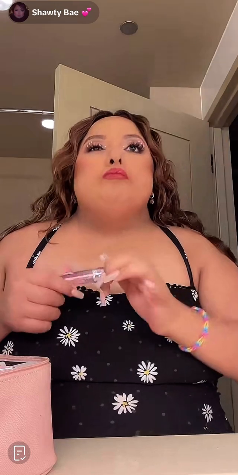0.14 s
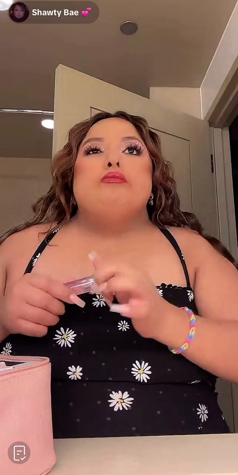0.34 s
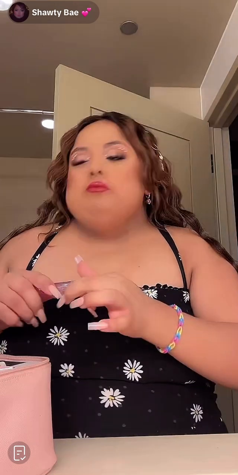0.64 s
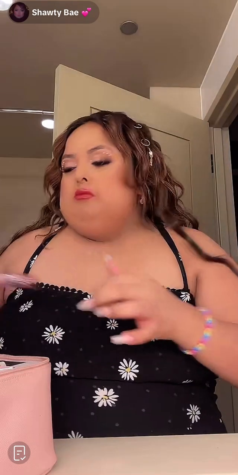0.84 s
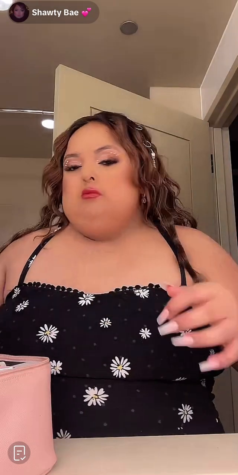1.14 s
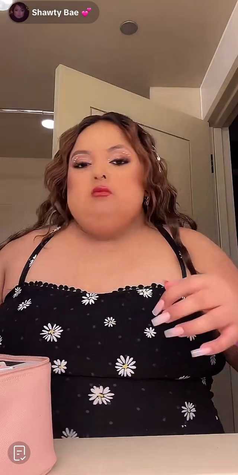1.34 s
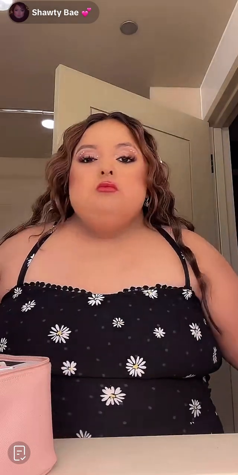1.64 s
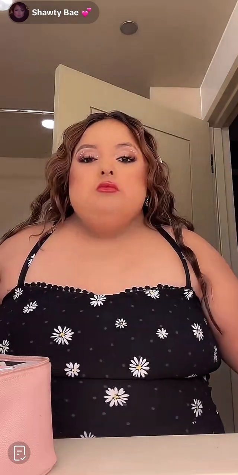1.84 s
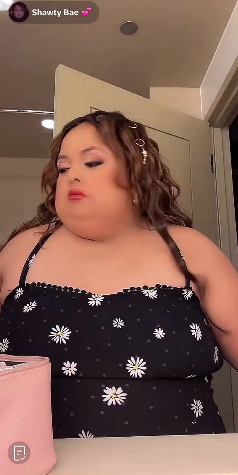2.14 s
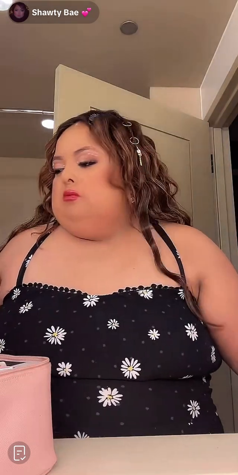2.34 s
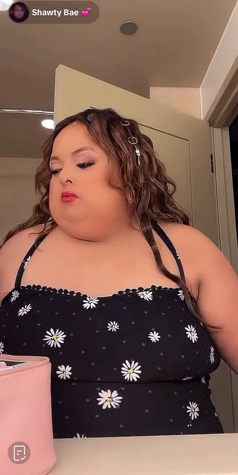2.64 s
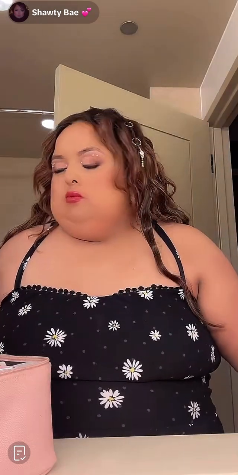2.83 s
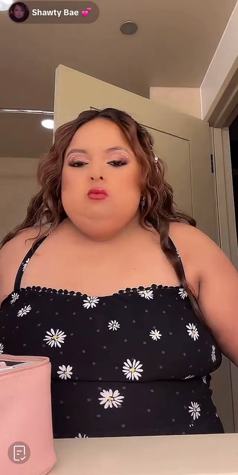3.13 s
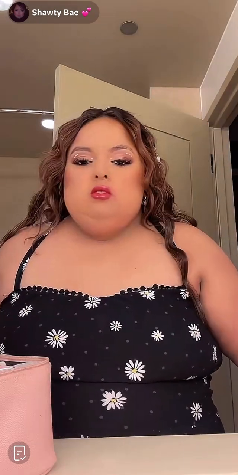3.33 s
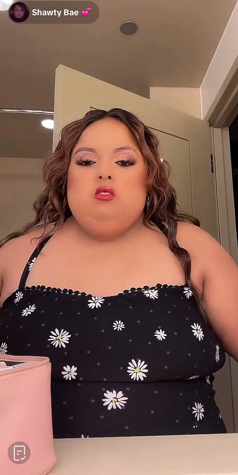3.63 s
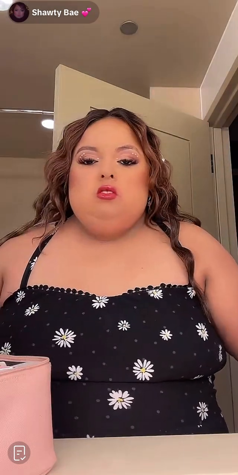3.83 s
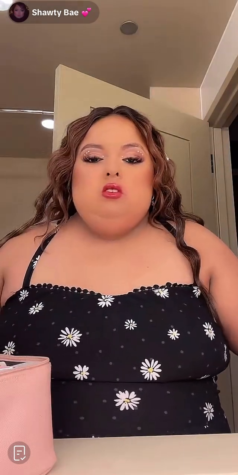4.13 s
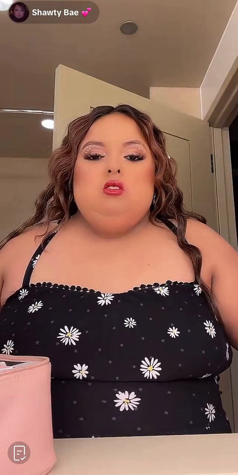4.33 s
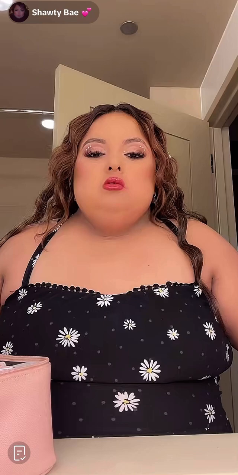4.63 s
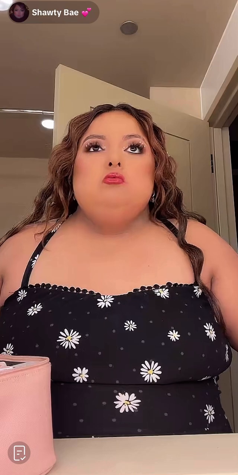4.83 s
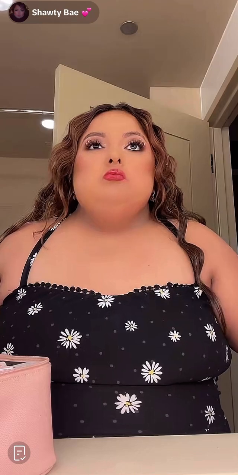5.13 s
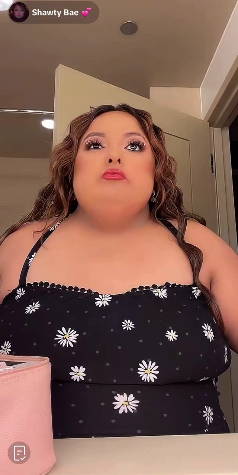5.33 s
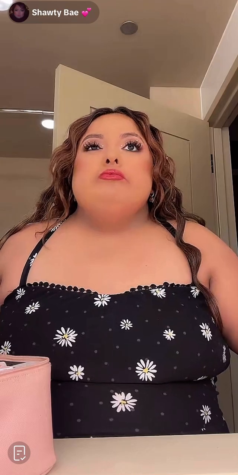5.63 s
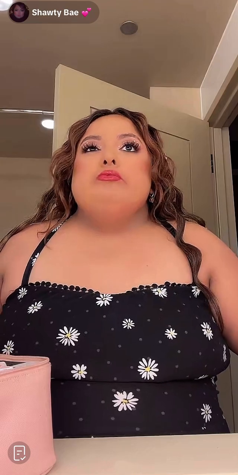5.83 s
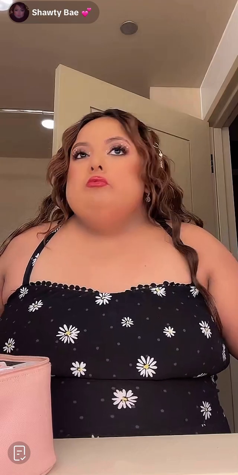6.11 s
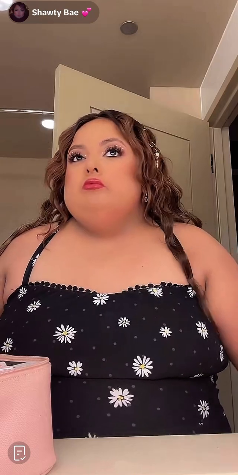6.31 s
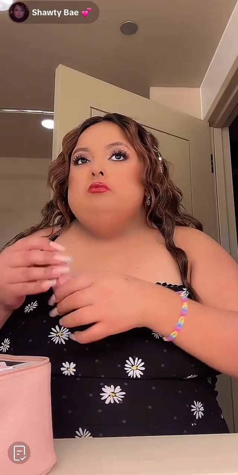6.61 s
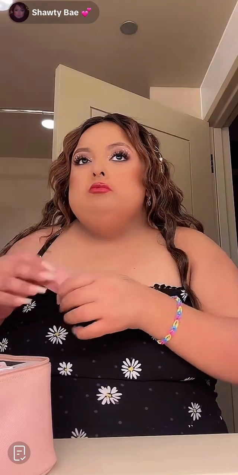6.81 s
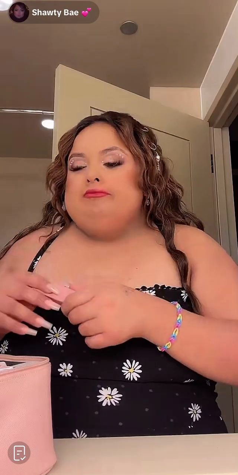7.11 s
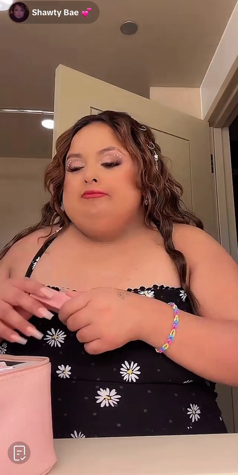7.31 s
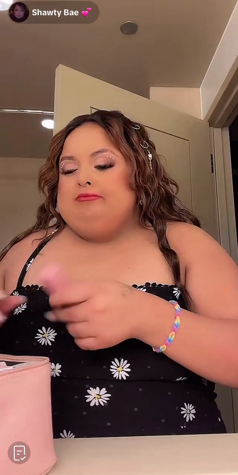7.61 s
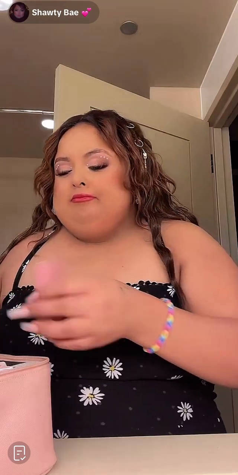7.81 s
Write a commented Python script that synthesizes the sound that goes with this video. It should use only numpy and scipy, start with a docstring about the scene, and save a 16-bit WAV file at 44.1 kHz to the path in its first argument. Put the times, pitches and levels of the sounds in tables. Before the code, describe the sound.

Small cosmetic tubes are set down sharply, then rummaged and knocked about on a countertop in a small, hard room with a faint low hum.

```python
"""A bathroom counter: plastic make-up tubes and caps are put down, picked up and rummaged through near a phone.
They click, knock and jostle as shaped noise bursts and short tones; rubs are grainy, filtered noise.
Heavier bumps boom as decaying sines in the counter, and a container rings in fuzzy narrow bands.
The small hard room answers every contact, over a low ventilation rumble of filtered noise."""
import sys
import numpy as np
from scipy import signal
from scipy.fft import rfft, irfft, next_fast_len
from scipy.io import wavfile
from scipy.ndimage import map_coordinates

SR = 44100
rng = np.random.default_rng(int(sys.argv[2]) if len(sys.argv) > 2 else 0)


def inscribe(sig):
    """Save sig as 16-bit PCM at rate SR to the path in sys.argv[1].

    A 1-D sig is mono; a 2-D sig holds one channel per row.
    Samples are clipped to [-1, 1] before scaling.
    """
    pcm = np.round(np.clip(np.atleast_2d(sig).T, -1, 1) * 32767)
    wavfile.write(sys.argv[1], SR, pcm.astype(np.int16))


N = 351035
SIZE = 32768  # longest single sound [samples]
T = np.arange(SIZE) / SR
HZ = np.fft.rfftfreq(SIZE, 1 / SR)

# Ventilation spectrum, relative: (frequency [Hz], density [dB per Hz])
VENT_SPECTRUM = [(20, -43.5), (40, -28.5), (58, -9.5), (78, -12.5), (100, -11), (128, 1), (165, -18.5),
                 (207, -6), (260, -21.5), (320, -19), (500, -29), (1400, -37), (5000, -40), (13000, -50.5)]
# Deepest room mode, stirred by the heavier bumps: (time [s], relative level [dB])
ROOM_MODE_LEVEL = [(0, -72), (1.53, -69.5), (1.72, -49), (1.95, -63.5), (3.1, -68), (3.39, -48),
                   (3.95, -65.5), (4.17, -30), (4.45, -47.5), (5.55, -51), (6, -58), (6.6, -50),
                   (7.96, -59)]
# Decay of the room's reflections: (frequency [Hz], time to fall 60 dB [s])
ROOM_DECAY = [(200, 0.29), (700, 0.4), (2000, 0.38), (5000, 0.66), (12000, 0.43)]
# Sideways scatter against the centre: (frequency [Hz], level [dB])
SIDE_LEVEL = [(2500, -73), (4500, -29.5), (8000, -3.5), (13000, -14.5)]
# Bumps on the counter: (time [s], level [dB], softness: corner above which modes weaken [Hz])
COUNTER_BUMPS = [(1.558, -33.5, 350), (1.627, -33.5, 260), (1.703, -29.5, 136.9), (3.298, -36.5, 251),
                 (3.344, -30.5, 401.3), (3.373, -35, 260), (3.965, -26.5, 109.6), (4.01, -15.5, 151),
                 (4.363, -34.5, 78), (4.636, -38.5, 380), (4.997, -36, 195), (6.181, -40.5, 379)]
# Modes of the counter: (frequency [Hz], level [dB], time to fall 60 dB [s])
COUNTER_MODES = [(58.2, -3.5, 0.45), (93.84, -2.5, 0.44), (117.2, -1.5, 0.29), (157, -0.5, 0.19),
                 (231.1, 1, 0.21), (308, 6, 0.31), (400, -3, 0.58)]
# Blows on the container: (time [s], level [dB], brightness [dB per octave], time to fall 60 dB [s], length [s])
CONTAINER_BLOWS = [(3.088, -43.5, 2, 0.42, 0.069), (5.197, -42, 11, 0.26, 0.21), (4.04, -38, 3.5, 3, 1),
                   (4.22, -58.5, -10, 3.7, 0.85), (5.0, -33.5, 2.5, 1.14, 0.2),
                   (6.16, -41.5, 5, 0.47, 0.43), (6.46, -50.5, 9, 0.58, 0.64)]
# Resonances of the container: (frequency [Hz], width [Hz], level [dB])
CONTAINER_MODES = [(654, 140, 3.5), (806, 68, 4), (1104, 50, -3.5), (1549, 490, 4), (1630, 44, -6),
                   (2480, 330, -5.5), (2680, 29, -4.5), (3390, 220, -10.5)]
# Loose items jostling: (start [s], end [s], tick density [1/s], level at the start [dB], fall by the end [dB])
JOSTLE_SPELLS = [(1.658, 1.77, 85, -25, 5), (4.047, 4.466, 50, -22.5, 8.5), (4.719, 4.84, 33, -21, 10),
                 (5.022, 5.183, 68, -17, 25)]
# Rubs of fingers, cases and the bag: (time of the peak [s], swell time [s], level [dB], centre [Hz])
RUB_STROKES = [(0.129, 0.05, -51, 5060), (0.439, 0.13, -65.5, 3400), (.75, 0.18, -58, 3900),
               (1.27, 0.21, -63, 4240), (1.77, 0.034, -40, 5190), (2.04, 0.036, -58.5, 10570),
               (2.106, 0.017, -39, 11200), (2.14, 0.051, -52, 10040), (2.278, 0.033, -49.5, 5990),
               (2.79, 0.029, -53.5, 3200), (2.833, 0.03, -52, 9030), (2.948, 0.057, -57.5, 3800),
               (3.289, 0.026, -31, 640), (3.379, .052, -25, 172), (3.391, 0.07, -30, 620),
               (3.455, 0.06, -29.5, 1070), (3.485, .048, -33, 4520), (3.868, 0.066, -50.5, 6300),
               (3.956, 0.016, -31.5, 3250), (4.11, 0.082, -28, 760), (4.38, 0.12, -36.5, 2780),
               (4.623, 0.0095, -25.5, 1430), (4.796, .028, -19.5, 980), (4.874, 0.043, -32.5, 676),
               (4.974, 0.03, -17, 1400), (4.991, 0.021, -24, 5700), (5.11, 0.071, -35, 1830),
               (5.241, 0.076, -50.5, 231.3), (5.8, 0.038, -61.5, 9460), (6.22, 0.054, -44, 305),
               (6.471, .033, -32, 4700), (6.719, 0.16, -59.5, 328), (6.938, 0.033, -60, 348),
               (6.749, .15, -49.5, 5340), (7.069, 0.03, -47.5, 9350), (7.159, 0.047, -42.5, 9080),
               (7.67, 0.056, -54, 7860), (7.931, 0.055, -54.5, 6450)]
# Spectral spread of a rub, broadest in the middle range: (centre [Hz], spread [octaves])
RUB_SPREAD = [(200, 0.26), (800, .8), (2500, 1), (6000, .6), (10000, 0.29)]
# Rubs that make one narrow resonance sing: (time of the peak [s], swell time [s], level [dB], centre [Hz])
SINGING_RUBS = [(.24, 0.035, -52, 4370), (1.28, 0.043, -47.5, 392.8), (1.8, 0.032, -43, 3860),
                (4.88, 0.035, -36, 7700), (4.88, 0.031, -36.5, 2740), (5.236, .045, -44.5, 1802),
                (5.8, 0.039, -58.5, 8900), (6.22, 0.047, -42, 3440), (6.2, 0.052, -53, 9500),
                (6.6, 0.17, -56.5, 1067), (6.67, 0.17, -57.5, 2650)]
# Short pitched knocks and ticks: (time of the peak [s], level [dB], centre [Hz])
PITCHED_KNOCKS = [(0.11, -47, 1500), (1.564, -14, 510), (3.492, -24, 519), (3.681, -45.5, 1800),
                  (4.637, -19, 498), (5.756, -37.5, 548), (7.776, -42.5, 2400), (7.814, -40.5, 2600)]
# Contacts of tubes and caps: (time [s], relative level [dB], main resonance [Hz],
# treble slope above it [dB per octave], rebound [dB], room answer [dB], length of the answer [s])
ITEM_CONTACTS = [(0.106, -68, 1640, -5, -11, -4, 0.12), (0.221, -52.5, 595, -5, -15, -7.5, 0.15),
                 (1.539, -48, 1100, -2.5, -18, -17, .06), (1.559, -19, 1184, -4.5, -3, -8, 0.47),
                 (1.575, -26, 3190, -2, -0.5, -7, .16), (1.628, -19, 1500, -1, -2.5, -7.5, 0.11),
                 (1.65, -22.5, 3730, 2, -7, -4.5, 0.17), (2.106, -53, 8000, 2.5, -11.5, -6.5, 0.12),
                 (3.085, -31.5, 2590, -13, -21.5, 0.5, 0.15), (3.091, -34.5, 1750, -8.5, -7.5, 1, 0.12),
                 (3.257, -29, 4810, -15.5, -3.5, -8.5, 0.097), (3.337, -22, 860, -3.5, -5.5, -8.5, .5),
                 (3.489, -33, 540, -1, -14, -8, 0.078), (3.961, -21.5, 5970, 2, -10, -13, .5),
                 (3.969, -32, 833, -0.5, -12.5, -1.5, 0.44), (4.009, -28.5, 1440, 0.5, -1.5, -18, .35),
                 (4.03, -15.5, 1250, -12, -14, -26, .4), (4.038, -22.5, 1090, -3, -14.5, -4.5, .65),
                 (4.213, -26.5, 2580, -8, -24, -4.5, .3), (4.223, -21, 3300, -7.5, -13, -5.5, 0.21),
                 (4.329, -25.5, 4010, -8, -14.5, -13, 0.21), (4.411, -37, 3340, 1.5, -12, -8, 0.054),
                 (4.623, -24.5, 1250, -1, -7, -8, .16), (4.706, -21, 580, -2.5, -2, -5, 0.17),
                 (4.744, -32.5, 800, -3, -16.5, -0.5, .35), (4.803, -30.5, 1270, -5, -14.5, -16, 0.093),
                 (4.963, -27.5, 950, -3, -14.5, 0.5, 0.4), (4.999, -20.5, 1100, -5, 0, -8, 0.29),
                 (5.195, -30.5, 2560, -5, 0, -10.5, 0.078), (5.743, -34, 514, -13.5, -3, -7.5, 0.1),
                 (6.033, -37, 800, -31.5, -22, -10.5, 0.11), (6.127, -33.5, 1054, -8.5, -7, -3, .2),
                 (6.182, -41, 1290, -6.5, -15, -16, .15), (6.216, -44, 1094, -7, -22.5, -5, .16),
                 (6.863, -50, 5770, 3, -29.5, -14, .06), (7.772, -51.5, 3550, 1, -7, -3.5, .12),
                 (7.811, -49, 2970, -7, -21, -9, 0.12)]
# Resonances shared by the hollow plastic cases: (frequency [Hz], width [Hz], boost [dB])
CASE_MODES = [(490, 38, 2), (804, 29, 4), (1190, 17, 3.5), (1330, 25, -1.5), (1773, 17, 10.5),
              (2639, 540, 3.5), (2690, 64, -4.5), (4000, 100, 3), (6357, 180, 5), (8760, 1200, 6)]


def amp(db):
    """Decibels to gain."""
    return 10 ** (np.asarray(db) / 20)


def unit(x):
    """Scaled to rms 1."""
    return x / np.sqrt(np.mean(x ** 2) + 1e-20)


def along(points, hz):
    """(frequency [Hz], value) points joined on a log axis."""
    f, v = np.transpose(points)
    return np.interp(np.log(hz + 1), np.log(f + 1), v)


def add(track, s, sound):
    """Mix a sound into the track from time s on."""
    start = max(round(s * SR), 0)
    part = track[start:start + len(sound)]
    part += sound[:len(part)]


def wobble(rate, size):
    """A random curve of straight segments, rate knots per SR points."""
    knots = rng.standard_normal(1024)
    return map_coordinates(knots, [np.arange(size) * rate / SR], order=1, mode="wrap")


def filtered(x, gain):
    """A whole track times a gain that depends on frequency."""
    m = next_fast_len(N + SIZE)
    return irfft(rfft(x, m) * gain(np.fft.rfftfreq(m, 1 / SR)), m)[..., :N]


def coloured(x, gain):
    """A causal (minimum-phase) filter with the given gain at HZ: nothing sounds before the blow."""
    cepstrum = irfft(np.log(np.maximum(gain, 1e-6)))
    cepstrum[1:SIZE // 2] *= 2
    cepstrum[SIZE // 2 + 1:] = 0
    return irfft(rfft(x) * np.exp(rfft(cepstrum)))


def resonance(hz, centre_hz, width_hz):
    """Gain of one resonance, 1 at its centre."""
    return 1 / np.sqrt(1 + (2 * (hz - centre_hz) / width_hz) ** 2)


def ventilation():
    """A steady low rumble with a faint hiss; the deepest room mode swells and sinks."""
    air_db, mode_db = -57, -1
    mode_hz, mode_width_hz = 58, 16
    air = unit(filtered(rng.standard_normal(N), lambda hz: amp(along(VENT_SPECTRUM, hz))))
    deep = unit(filtered(rng.standard_normal(N), lambda hz: resonance(hz, mode_hz, mode_width_hz) ** 2))
    swell_db = np.interp(np.arange(N) / SR, *np.transpose(ROOM_MODE_LEVEL))
    return amp(air_db) * air + amp(swell_db + mode_db) * deep


def room_answer():
    """Dense reflections as noise; each frequency dies at its own speed."""
    hz, t, z = signal.stft(rng.standard_normal(SIZE), SR, nperseg=256)
    decay = amp(-60 * t / along(ROOM_DECAY, hz)[:, None])
    return signal.istft(z * decay, SR, nperseg=256)[1][:SIZE]


def bumps():
    """Heavier blows boom in the counter; soft ones reach mainly its lowest modes."""
    attack_s, length_s = 0.002, 0.36
    waver_rad, waver_rate = 0.98, 25  # random phase drift of each mode, knots a second
    track = np.zeros(N)
    for s, db, soft_hz in COUNTER_BUMPS:
        boom = np.zeros(SIZE)
        for hz, level, t60 in COUNTER_MODES:
            softening = np.sqrt(1 + (hz / soft_hz) ** 4)
            phase = 2 * np.pi * hz * T + waver_rad * wobble(waver_rate, SIZE)
            boom += amp(level - 60 * T / t60) / softening * np.sin(phase)
        envelope = (1 - np.exp(-T / attack_s)) * np.exp(-(T / length_s) ** 4)
        add(track, s, amp(db) * envelope * boom)
    return track


def chimes():
    """A struck container rings on in fuzzy lines: noise through narrow resonances, dying away."""
    attack_s, tilt_pivot_hz = 0.012, 1500
    track = np.zeros(N)
    for s, db, tilt_db, t60, length in CONTAINER_BLOWS:
        ring = np.zeros(SIZE)
        for hz, width, level in CONTAINER_MODES:
            line = irfft(rfft(rng.standard_normal(SIZE)) * resonance(HZ, hz, width) ** 2)
            ring += amp(level + tilt_db * np.log2(hz / tilt_pivot_hz)) * unit(line) / np.sqrt(2)
        envelope = (1 - np.exp(-T / attack_s)) * np.exp(-(T / length) ** 6)
        add(track, s, amp(db - 60 * T / t60) * envelope * ring)
    return track


def jostles():
    """Small irregular ticks, each a brief ring of two modes of some cap or tube."""
    tick_hz, pitch_spread = 2800, 0.55  # spread in natural-log units
    cycles, size_db = 9, 2.0  # cycles to fall to 1/e; random spread of level
    track = np.zeros(N)
    t = T[:SR // 20]
    for start, end, density, db, fall_db in JOSTLE_SPELLS:
        draws = rng.standard_normal((64, 4))  # gap, size and two pitches of each tick
        times = start + np.cumsum(np.abs(draws[:, 0])) / density
        for s, (_, size, *pitches) in zip(times[times < end], draws):
            hz = np.clip(tick_hz * np.exp(pitch_spread * np.array(pitches)), 1500, 11000)[:, None]
            tick = np.mean(np.sin(2 * np.pi * hz * t) * np.exp(-hz * t / cycles), axis=0)
            tick_db = db + size_db * size - fall_db * (s - start) / (end - start)
            add(track, s, amp(tick_db) * tick)
    return track


def strokes():
    """All rubs and knocks as (peak [s], rise [s], fall [s], level [dB], centre [Hz], spread [octaves])."""
    fall_over_rise = 1.07  # a rub dies a little slower than it swells
    sing_octaves = 0.028
    knock_rise_s, knock_fall_s, knock_octaves = 0.005, 0.016, 0.092  # brief and narrow
    rubs = [(s, swell, fall_over_rise * swell, db, hz, along(RUB_SPREAD, hz))
            for s, swell, db, hz in RUB_STROKES]
    sings = [(s, swell, fall_over_rise * swell, db, hz, sing_octaves)
             for s, swell, db, hz in SINGING_RUBS]
    knocks = [(s, knock_rise_s, knock_fall_s, db, hz, knock_octaves) for s, db, hz in PITCHED_KNOCKS]
    return rubs + sings + knocks


def slides():
    """Tiny slips and catches as noise; a narrow resonance makes a long rub sing and pitches a short knock."""
    grain_db, grain_rate = 3, 450  # slips, knots a second
    catch_db, catch_rate = 1.5, 70  # catches, knots a second
    edge_db, ripple_db = 12, 6  # drop one rise or fall time from the peak; spectral ripple
    track = np.zeros(N)
    for s, rise, fall, db, centre_hz, octaves in strokes():
        start = max(s - 2.5 * rise, 0)
        t = T + start - s
        distance = np.abs(np.where(t < 0, t / rise, t / fall))
        stroke = amp(db - edge_db * distance ** 1.32)
        grain = grain_db * wobble(grain_rate, SIZE) + catch_db * wobble(catch_rate, SIZE)
        slips = rng.standard_normal(SIZE) * amp(grain)
        body = np.exp(-(np.log2((HZ + 1) / centre_hz) / (2 * octaves)) ** 2) / np.sqrt(HZ + 1)
        body = body * amp(ripple_db * wobble(400, len(HZ)))  # many small resonances of the case
        add(track, start, stroke * unit(coloured(slips, body)))
    return track


def small_modes():
    """Every blow wakes its own set of narrow resonances: a random gain at HZ."""
    return unit(amp(3.8 * wobble(520, len(HZ))))


def item_colour(main_hz, treble_db):
    """Gain at HZ of a struck item: its main resonance and slopes, the cases' modes and small ones."""
    main_db, main_q = 8, 6
    bass_loss_db, bass_curve = 7, 1.61  # loss one octave under the main resonance; power of its growth
    low_hz, high_hz = 400, 9800
    cases = 1 + sum((amp(db) - 1) * resonance(HZ, hz, width) ** 2 for hz, width, db in CASE_MODES)
    # small objects radiate little bass; the power per octave is otherwise level up to high_hz
    low_cut, high_cut = 1 + (low_hz / (HZ + 1)) ** 8, 1 + (HZ / high_hz) ** 6
    radiation = np.sqrt(SR / 2 / (HZ + 1) / low_cut / high_cut)
    octaves = np.log2((HZ + 1) / main_hz)
    bass_db = bass_loss_db * np.maximum(-octaves, 0) ** bass_curve
    slopes = amp(treble_db * np.maximum(octaves, 0) - bass_db)
    item = 1 + (amp(main_db) - 1) * resonance(HZ, main_hz, main_hz / main_q) ** 2
    return slopes * radiation * cases * item * small_modes()


def contacts():
    """Contact and rebound: graze, snap, crackle and room answer through the item's resonances."""
    clack_db, clack_t60, snap_db = 3, 0.0054, 12  # t60: seconds to fall 60 dB
    crack_db, crack_t60 = 0, 0.071
    graze_db, graze_rise_s, onset_s = -17, 0.0057, 0.0025  # onset of the room answer
    rebound_s = 0.009  # the other end of an item lands this much later
    lead = SR // 40  # samples of graze before the blow
    track = np.zeros(N)
    for s, db, main_hz, treble_db, rebound_db, room_db, length in ITEM_CONTACTS:
        colour = item_colour(main_hz, treble_db)
        for delay, strike_db in (0, db), (rebound_s, db + rebound_db):
            # surfaces brush just before they meet
            graze_swell = np.exp(-T[:lead][::-1] / graze_rise_s)
            graze = amp(graze_db) * graze_swell * rng.standard_normal(lead)
            clack = amp(clack_db - 60 * T / clack_t60)  # stiff walls give up their energy at once
            crackle = amp(crack_db - 60 * T / crack_t60)
            burst = (clack + crackle) * rng.standard_normal(SIZE)
            burst[0] += amp(snap_db)
            answer = amp(room_db) * (1 - np.exp(-T / onset_s)) * room_answer()
            blow = (burst + answer) * np.exp(-(T / length) ** 4)  # the tail ends abruptly
            strike = coloured(np.concatenate([graze, blow])[:SIZE], colour)
            add(track, s + delay - lead / SR, amp(strike_db) * strike)
    return track


def scene():
    """Everything is straight ahead; only the treble scatters to the sides."""
    mid = ventilation() + bumps() + chimes() + jostles() + slides() + contacts()
    scatter = rng.standard_normal(256) * np.hanning(256)
    scattered = signal.fftconvolve(mid, scatter / np.linalg.norm(scatter))[:N]
    side = filtered(scattered, lambda hz: amp(along(SIDE_LEVEL, hz)))
    return np.array([mid + side, mid - side])


def record(dry):
    """The phone rounds off the highest peaks and drops the deepest bass and all above its band limit."""
    ceiling, bottom_hz, top_hz = 0.7, 44, 13150
    rounded = dry / (1 + (dry / ceiling) ** 6) ** (1 / 6)
    return filtered(rounded, lambda hz: 1 / np.sqrt(
        (1 + (bottom_hz / (hz + 1)) ** 8) * (1 + (hz / top_hz) ** 160)))


dry = scene()
out = record(dry)
inscribe(out)
```